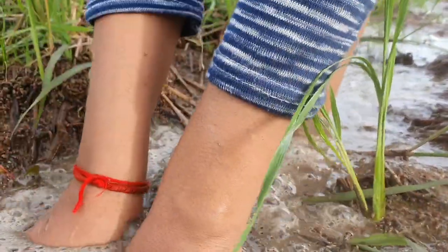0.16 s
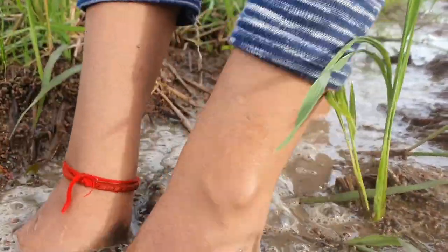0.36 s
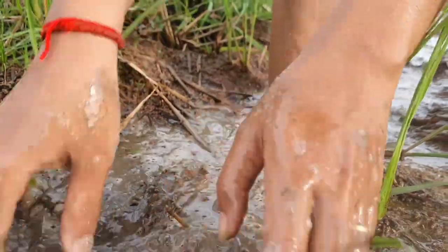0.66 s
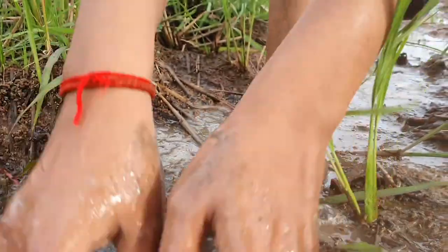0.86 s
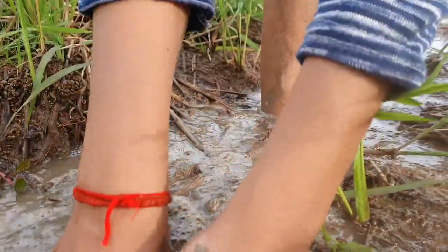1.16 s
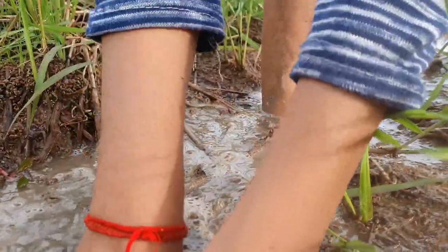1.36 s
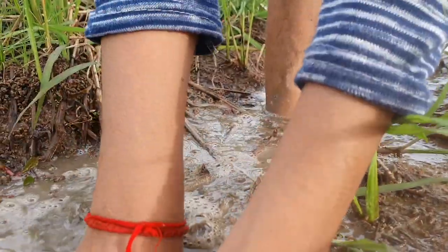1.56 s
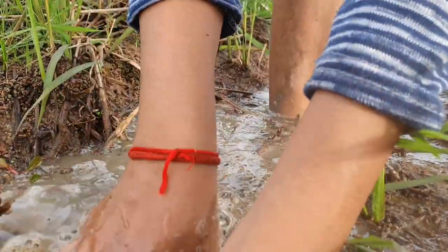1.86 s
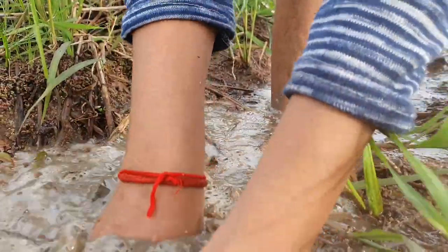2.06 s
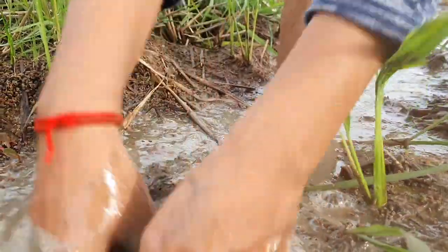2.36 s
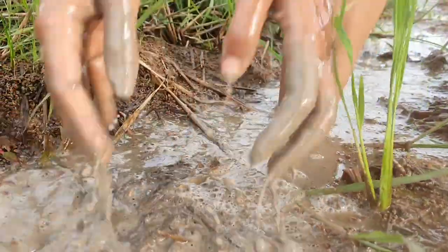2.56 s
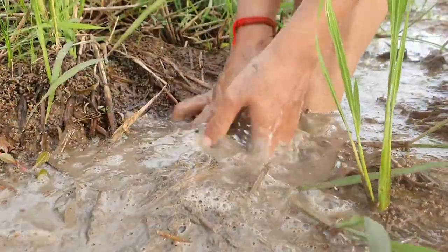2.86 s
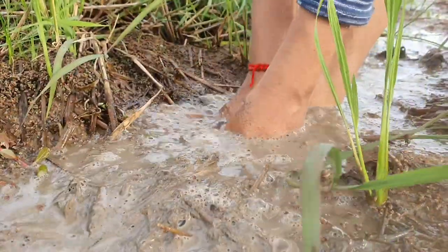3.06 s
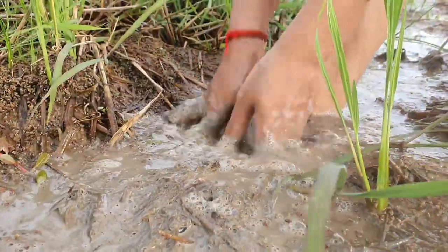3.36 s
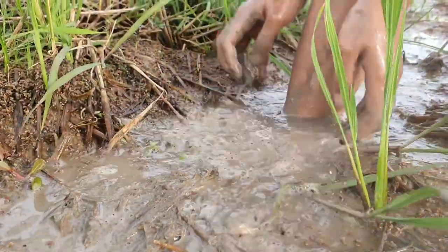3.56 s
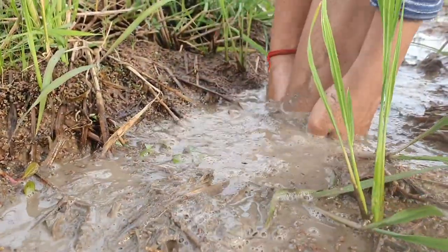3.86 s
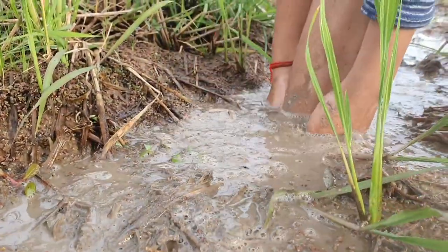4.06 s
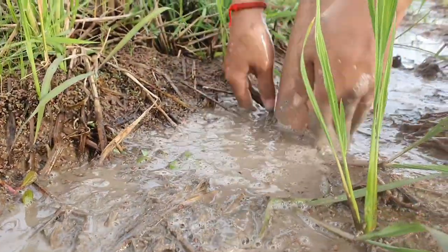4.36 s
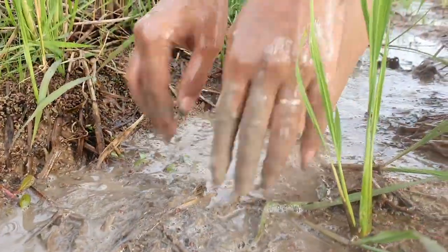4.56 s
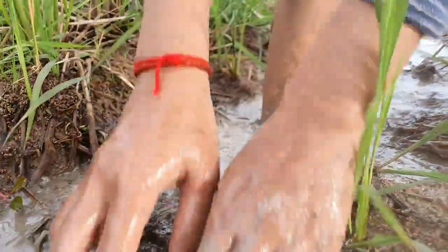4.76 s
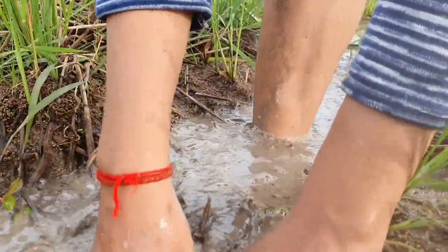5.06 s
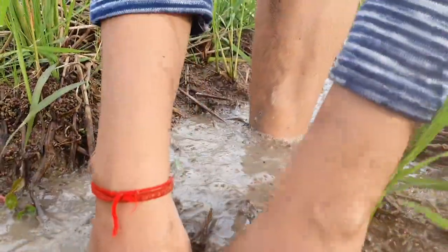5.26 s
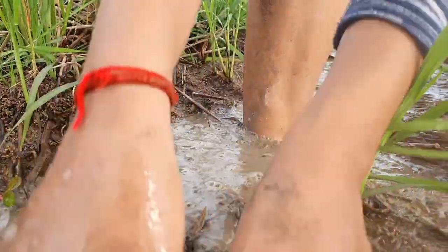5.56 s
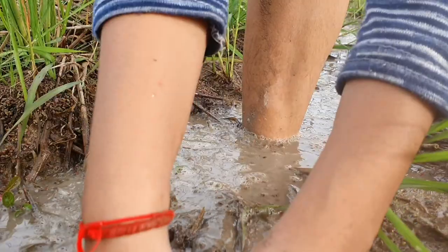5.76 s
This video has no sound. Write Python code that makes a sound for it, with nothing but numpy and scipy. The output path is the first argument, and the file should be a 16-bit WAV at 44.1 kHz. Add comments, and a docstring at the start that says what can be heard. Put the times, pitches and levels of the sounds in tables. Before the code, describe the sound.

Hands slosh and scoop in shallow muddy water, with bubbly plops, wet slaps and fizzing droplets over a low breeze outdoors.

```python
"""A field with shallow muddy water, hands scooping and sloshing close to a phone with two microphone ports.
Trapped air pops as damped sines, most of them rising, over swarms of small random bubbles.
Shaped noise makes the fizzing spray and the slaps on skin and mud; a short noise tail scatters it all.
Low lumpy noise, nearly separate on each port, is the breeze; steady coloured noise is the field's hush."""
import sys
import numpy as np
from scipy import signal
from scipy.fft import rfft, irfft, next_fast_len
from scipy.io import wavfile
from scipy.ndimage import map_coordinates

SR = 44100
rng = np.random.default_rng(int(sys.argv[2]) if len(sys.argv) > 2 else 0)


def wav_record(signal):
    """Record a signal, one row per channel, as 16-bit PCM in the file named by sys.argv[1]."""
    frames = np.transpose(np.atleast_2d(signal))
    bounded = np.clip(frames, -1, 1)
    # unit amplitude maps onto the largest positive 16-bit level
    quanta = np.round(bounded * 32767).astype(np.int16)
    wavfile.write(sys.argv[1], SR, quanta)


N = 261072  # length [samples]

# clear bubbles at the hands, levels before wavering and port balance:
# (time [s], peak level [dB], start pitch [Hz], t60 [ms], pitch rise [1/s])
CLEAR_BUBBLES = [(0.198, -33.5, 2483, 23, 4), (0.2065, -25.5, 590, 3.8, -2), (0.2056, -27.5, 2510, 13, 9),
                 (0.2139, -39, 1600, 50, 28.5), (0.304, -41, 679, 135, 10.5),
                 (0.3408, -29.5, 1010, 8.8, 30), (0.411, -41.5, 3040, 35, -1), (0.415, -42.5, 1080, 35, 24),
                 (0.504, -33, 1540, 23, 23), (0.5246, -33, 1640, 21, 6), (0.753, -38.5, 2040, 56, 0.5),
                 (0.83, -40, 3020, 27, -2), (0.9217, -37.5, 915, 18, -8), (1.084, -36.5, 2270, 22, 31),
                 (1.0968, -33, 1290, 14, -4), (1.1003, -38, 3040, 28, 12), (1.1741, -27, 1130, 11, 25),
                 (1.228, -38.5, 686, 21, 1), (1.246, -41.5, 640, 26, 7), (1.416, -24, 1123, 44, 24),
                 (1.453, -34, 1950, 16, 32), (1.4883, -20.5, 1730, 4.6, 12), (1.488, -32.5, 2654, 23, 6),
                 (1.539, -34.5, 2940, 16, 26), (1.559, -27, 910, 5.5, 55), (1.5907, -32.5, 1620, 12.9, 12),
                 (1.6982, -38.5, 910, 13, 5), (1.7815, -27, 2110, 4.7, 30), (1.915, -35.5, 975, 28, 3),
                 (1.9444, -27.5, 1410, 12, 29), (1.9682, -40, 3180, 14, 4), (2.26, -40, 318, 29, 14),
                 (2.31, -32.5, 790, 31, 11.5), (2.4317, -35, 1266, 22, -2), (2.5405, -34, 1157, 26, 2),
                 (2.5405, -22.5, 2250, 26, 6), (2.6561, -31, 2650, 18, -1), (2.727, -33.5, 1237, 18, -7),
                 (2.728, -43, 675, 40, 10), (2.955, -42.5, 1850, 37, 4), (3.07, -40, 1570, 18, 11),
                 (3.2805, -40.5, 860, 12, 17), (3.47, -41.5, 1000, 11, -3), (3.51, -37.5, 2320, 18, 12),
                 (3.8328, -42, 1216, 30, 1.5), (3.833, -38, 2955, 19, 3.5), (4.042, -46.5, 1470, 21, -6),
                 (4.082, -29.5, 1887, 19.6, 26), (4.9793, -37, 1790, 43, 10), (4.9793, -32, 3520, 16.5, 5),
                 (5.035, -41, 2900, 24, -10), (5.0313, -30.5, 6300, 7.9, 39), (5.0622, -34, 2080, 24, -1),
                 (5.064, -37, 1270, 18, 4), (5.082, -36.5, 2330, 20, -7), (5.24, -38, 1724, 17, 15),
                 (5.346, -28.5, 2180, 12, 31), (5.516, -25.5, 2245, 31, 25), (5.59, -36, 1165, 32, 3.5),
                 (5.67, -40.5, 1560, 17, 7), (5.774, -28, 2520, 16, -1), (5.8073, -33, 2920, 28, -12),
                 (5.8097, -38, 1352, 19, 4), (5.8465, -25.5, 1910, 13, 0), (5.867, -26, 1870, 12, 34)]


def bubbles():
    """Trapped air rings; most pitches climb ever faster, others hold nearly steady."""
    s, db, hz, t60_ms, rise = np.transpose(CLEAR_BUBBLES)
    lag, pan_db = port_gap(s)
    return blips(s, db, hz, t60_ms / 1000, rise, pan_db, lag, attack=1.6, ragged=0.65, size=3500, hold=1.4)


# droplets and small pockets bursting, levels before wavering and port balance:
# (time [s], peak level [dB], pitch [Hz])
BURSTING_DROPLETS = [(0.002, -35.5, 1260), (0.022, -45, 2570), (0.0618, -28.5, 2740), (0.093, -40, 2550),
                     (0.1338, -38.5, 11850), (0.17, -34, 2870), (0.177, -31, 1490), (0.238, -36, 1060),
                     (0.249, -38, 2990), (0.258, -38.5, 1040), (0.2872, -35, 6170), (0.2902, -43, 9800),
                     (0.61, -38.5, 7600), (0.6604, -45, 9650), (0.5805, -39, 1850), (0.807, -41.5, 7260),
                     (0.852, -37, 5730), (0.8898, -42, 6460), (1.035, -39, 10600), (1.0434, -31.5, 2330),
                     (1.0535, -38.5, 4260), (1.134, -31, 1120), (1.2046, -33, 2120), (1.292, -43, 3420),
                     (1.299, -39, 3760), (1.315, -36.5, 2280), (1.4295, -40, 4700), (1.535, -36, 1390),
                     (1.6, -37.5, 13300), (1.6364, -33.5, 2380), (1.6589, -34, 1070), (1.684, -41.5, 11000),
                     (1.7, -47, 12400), (1.838, -28.5, 5500), (1.938, -26, 1390), (1.9725, -29.5, 1504),
                     (2.165, -47, 14400), (2.1823, -44, 13600), (2.4947, -35, 2150), (2.5007, -46, 12800),
                     (2.5342, -37, 4000), (2.5967, -31.5, 3400), (2.611, -23.5, 3280), (2.6175, -32, 3820),
                     (2.648, -31.5, 2670), (2.7518, -40, 9800), (2.8469, -43, 14300), (2.8807, -33.5, 3600),
                     (2.952, -29, 4830), (2.991, -27, 5020), (2.997, -25.5, 4170), (3.019, -40, 2120),
                     (3.0352, -37, 1200), (3.055, -38.5, 1380), (3.093, -39, 1950), (3.121, -42.5, 1260),
                     (3.308, -44.5, 11200), (3.586, -32.5, 1873), (3.6395, -35, 2650), (3.745, -41, 6840),
                     (3.769, -38, 4080), (3.7965, -43.5, 3540), (3.8166, -42, 3430), (4.9653, -25, 3200),
                     (5.098, -32.5, 2200), (5.11, -42, 6750), (5.462, -37, 1790), (5.4783, -47, 4350),
                     (5.5279, -29, 6390), (5.606, -51, 14000), (5.637, -44, 1080), (5.729, -35.5, 695),
                     (5.8883, -33.5, 878)]
# colour of the spit from a bursting droplet: (frequency [Hz], relative density [dB per Hz])
SPIT_COLOUR = [(6000, -20), (11000, -3), (16000, -1)]
DROP_T60_S = 0.012  # at 2000 Hz; shorter above, longer below
DROP_SWELL_S = 0.00033  # main part of the swell's time constant


def droplets():
    """Short pops at a steady pitch; the higher, the shorter, and the more they spit spray."""
    s, db, hz = np.transpose(BURSTING_DROPLETS)
    lag, pan_db = port_gap(s)
    spit_db = db - 3 + 50 * np.log10(hz / 12000)
    spit = bursts(s, spit_db, t60=0.017) * rush(SPIT_COLOUR, [(5000, 0.45)])
    t60 = DROP_T60_S * (2000 / hz) ** 0.5
    attack = DROP_SWELL_S * hz[:, None]  # in cycles
    pops = blips(s, db, hz, t60, 0 * s, pan_db, lag, attack=attack, ragged=0.58, size=800)
    return spit + pops


# colour of the hissing spray: (frequency [Hz], relative density [dB per Hz])
SPRAY_COLOUR = [(2500, -20), (7000, -2.5), (9500, -18.5), (12000, -7), (16000, -9)]


def slosh():
    """Stirred water gurgles, glugs and crackles in clumps; thrown water fizzes, and hisses in its own clumps."""
    stir, bubble_hz, thrown = strokes()
    clumps_db = 1.2 * wobble(16) + 2.2 * wobble(70)
    crowd = stir ** CROWDING
    gurgle = amp(-7.5 + clumps_db) * swarm(count=1700, hz=bubble_hz, crowd=crowd, spread=0.424,
                                           cycles=10, uneven_db=3.5, size=700)
    glug = amp(-7.0 + clumps_db) * swarm(count=1300, hz=0.36 * bubble_hz, crowd=crowd, spread=0.35,
                                         cycles=3.5, uneven_db=3, size=600)
    crackle = amp(-10.5 + clumps_db) * swarm(count=2000, hz=np.full(N, 3100), crowd=crowd, spread=0.3,
                                             cycles=4, uneven_db=4.5, size=250)
    fizz = amp(-5) * swarm(count=3000, hz=np.full(N, 8000), crowd=thrown ** CROWDING, spread=0.61,
                           cycles=3, uneven_db=4.5, size=100)
    spray = amp(-1.5 + 2.4 * wobble(50)) * rush(SPRAY_COLOUR, [(5000, .3)])
    return stir * (gurgle + glug + crackle) + thrown * (fizz + spray)


# sloshes of the hands, gains before each layer's own level:
# (time [s], held [s], stirring gain [dB], typical bubble pitch [Hz], thrown water gain [dB])
HAND_SLOSHES = [(0.0, .17, -44, 1776, -65.5), (0.17, 0.045, -44, 1720, -59), (0.45, 0.23, -56, 1910, -65.5),
                (0.73, 0.14, -54, 1980, -64), (1.075, 0.075, -50, 1870, -60.5),
                (1.219, 0.07, -48.5, 1710, -79), (1.431, 0.24, -48, 1177, -69.5),
                (1.921, 0.052, -48.5, 1030, -63.5), (2.299, 0.095, -53.5, 1610, -71.5),
                (2.5, 0.13, -49, 2860, -62), (3.0, .1, -47.5, 1315, -62.5), (3.18, .16, -55, 1220, -67.5),
                (3.5, 0.079, -51.5, 1840, -61.5), (3.79, 0.013, -52, 1850, -58),
                (4.965, .02, -52, 3060, -66), (5.032, .012, -46, 2400, -53.5), (5.07, .05, -49, 2140, -68),
                (5.499, 0.014, -45.5, 3160, -59.5), (5.56, .11, -58, 1320, -63.5),
                (5.79, 0.09, -51, 1270, -67)]
SWELL_DB_PER_S, SETTLE_DB_PER_S = 260, 250  # how fast the stirring builds and dies away
CALM_DB, TRICKLE_DB, CALM_HZ = -62.5, -63, 2040  # between sloshes: stirring, dripping, bubble pitch
THROWN_SHARPER = 1.8  # thrown water comes and goes this much faster than the stirring
CROWDING = .62  # bubbles a second grow with the gain of the water to this power


def strokes():
    """Each slosh swells, holds and settles: gain of stirring, its bubble pitch, gain of thrown water."""
    s, held, stir_db, hz, thrown_db = np.transpose(HAND_SLOSHES)
    shape = peaked(s, held, SWELL_DB_PER_S, SETTLE_DB_PER_S)
    stir = amp(CALM_DB) + amp(stir_db) @ shape
    pitch = (amp(CALM_DB) * CALM_HZ + (amp(stir_db) * hz) @ shape) / stir  # the stronger water sets the pitch
    trickle = amp(TRICKLE_DB + curves(STILL_SPELLS)[0])
    thrown = trickle + amp(thrown_db) @ shape ** THROWN_SHARPER
    return stir, pitch, thrown


def swarm(count, hz, crowd, spread, cycles, uneven_db, size):
    """Random bubbles of log-normal size round the hands, rms 1; hz and crowd: pitch and density per sample."""
    draw = rng.random(count)
    odd = np.clip(rng.standard_normal((count, 5)), -2, 2)
    at = np.minimum(np.searchsorted(np.cumsum(crowd), draw * crowd.sum()), N - 1)
    s = at / SR
    pitch = np.clip(hz[at] * np.exp(spread * odd[:, 0]), 250, 15000)
    t60 = cycles * np.exp(0.62 * odd[:, 1]) / pitch
    lag, pan_db = port_gap(s)
    lag, pan_db = lag + 1.5e-4 * odd[:, 2], pan_db + 4 * odd[:, 3]  # scattered round the hands
    db = uneven_db * odd[:, 4] - 10 * np.log10(crowd[at])  # denser but softer, so the swarm stays even
    return unit(blips(s, db, pitch, t60, 0.2 / t60, pan_db, lag, attack=8, ragged=0.4, size=size))


# slaps of water on skin and mud, gains on noise of rms 1:
# (time [s], splash gain [dB], low squelch gain [dB])
WATER_SLAPS = [(0.207, -61, -32), (1.1326, -44, -49), (1.214, -62, -48), (1.241, -62, -54),
               (1.2982, -44.5, -42.5), (2.4177, -48, -42), (2.5391, -36.5, -59), (2.8807, -45, -41),
               (2.992, -39, -43), (3.014, -62, -42), (3.832, -42.5, -64), (4.037, -45, -64),
               (5.0312, -29.5, -55), (5.1273, -61, -43.5), (5.3434, -55, -40.5), (5.516, -34, -43),
               (5.728, -65, -46), (5.806, -40.5, -68)]
# colour of a breaking water film: (frequency [Hz], relative density [dB per Hz])
FILM_COLOUR = [(300, -11), (4000, 10), (16000, -15)]
# colour of a squelch of mud: (frequency [Hz], relative density [dB per Hz])
MUD_COLOUR = [(120, 5), (300, 3), (900, -8.5), (2500, -6), (6000, -62)]
SLAP_T60_S, SQUELCH_T60_S = 0.031, 0.05


def smacks():
    """Slaps break the water film and squelch the mud: quick bursts of bright and low noise."""
    slap_s, splash_db, squelch_db = np.transpose(WATER_SLAPS)
    film = bursts(slap_s, splash_db, SLAP_T60_S) * rush(FILM_COLOUR, [(1000, 0.17)])
    squelch = bursts(slap_s, squelch_db, SQUELCH_T60_S) * rush(MUD_COLOUR, [(500, 1.0)])
    return film + squelch


# where the hands are, as heard at the ports: (time [s], right port later by [ms])
HAND_PLACE = [(0, 0.25), (1.7, 0.29), (2.55, 0.19), (3, 0.086), (4.5, 0.03), (5, 0.19), (5.92, 0.2)]


def port_gap(s):
    """A sound at the hands: delay of the right port in seconds, and the left-right dB that goes with it."""
    later_ms = np.interp(s, *np.transpose(HAND_PLACE))
    return later_ms / 1000, -1.5 + 16 * later_ms


def surroundings(x):
    """Arms, bank and stems scatter a short diffuse answer."""
    t = np.arange(3000) / SR
    tail = rng.standard_normal((2, len(t))) * amp(-60 * t / 0.06) * (t > .002)
    return signal.fftconvolve(x, tail / np.linalg.norm(tail[0]), axes=1)[:, :N]


# breeze on the ports: (time [s], level [dB], left minus right [dB])
BREEZE_ON_PORTS = [(0, -46.5, -7), (.45, -41.5, -9), (1.0, -39.5, -8), (1.7, -43, -1), (2.2, -48.5, -3),
                   (2.95, -47, -3.5), (3.3, -45, -12.5), (3.85, -50.5, 0), (4.6, -45, -12.5),
                   (5.15, -50, -3.5), (5.92, -46.5, -9.5)]
# sudden gusts, gains added to the breeze: (time [s], left gain [dB], right gain [dB])
SUDDEN_GUSTS = [(0.0, -32, -41), (0.243, -38, -36), (.385, -24, -25), (.44, -50, -41), (0.633, -41, -20.5),
                (.97, -37, -32), (1.322, -47, -31), (3.24, -49, -39), (4.82, -61, -33)]
# colour of the buffeting: (frequency [Hz], relative density [dB per Hz])
BUFFET_COLOUR = [(12, -48), (20, -8.5), (82, -2), (125, -17.5), (161, -23), (500, -50.5), (650, -95),
                 (1100, -120)]
GUST_RISE_DB_PER_S, GUST_FALL_DB_PER_S = 249, 176


def breeze():
    """Eddies thump each port almost separately, in lumps; gusts come on top."""
    level_db, pan_db = curves(BREEZE_ON_PORTS)
    s, *ports_db = np.transpose(SUDDEN_GUSTS)
    gusts = amp(ports_db) @ peaked(s, 0 * s, GUST_RISE_DB_PER_S, GUST_FALL_DB_PER_S)
    steady = amp([level_db + pan_db / 2, level_db - pan_db / 2])
    lumps = amp(2.5 * np.array([wobble(18), wobble(18)]))
    buffet = unit(lumps * rush(BUFFET_COLOUR, [(60, 0.17)]))
    return (steady + gusts) * buffet


# colour of the field's hush: (frequency [Hz], relative density [dB per Hz])
HUSH_COLOUR = [(70, -3.5), (120, -4.5), (200, -8), (350, -8.5), (670, -13), (1050, -23.5), (2300, -25),
               (3400, -20), (4400, -26.5), (9400, -38), (16000, -38)]
# how alike the hush is at both ports: (frequency [Hz], likeness [-1 to 1])
HUSH_LIKENESS = [(130, 1), (300, 0.46), (650, 0.0086)]
# change in level of the hush, and of the dripping in strokes(): (time [s], level [dB])
STILL_SPELLS = [(0, 0), (3.6, 0), (4.5, -3.5), (5.1, -2)]


def field():
    """The hush of grass and distance: coloured noise, slightly unsteady."""
    drift_db = .7 * wobble(3)
    return amp(-51.5 + drift_db + curves(STILL_SPELLS)[0]) * rush(HUSH_COLOUR, HUSH_LIKENESS)


def blips(s, db, hz, t60, rise, pan_db, lag, attack, ragged, size, hold=1):
    """Damped sines, gliding by rise; a positive lag reaches the left port first, the right port later."""
    s, db, hz, t60, rise, pan_db, lag = (np.asarray(v)[:, None] for v in (s, db, hz, t60, rise, pan_db, lag))
    out = np.zeros((2, N))
    for port, side in enumerate((1, -1)):
        start = (s - side * lag / 2) * SR
        index = np.clip(np.floor(start).astype(int) + np.arange(size), 0, N - 1)
        t = np.maximum(index - start, 0) / SR
        # the neck pinches off over a few cycles, set by attack; long gulps swell slower
        swell = 1 - np.exp(-t / (attack / hz + 0.01 * t60))
        # small bubbles are torn by the splash, all waver
        tearing = ragged * np.minimum(hz / 3000, 1) ** 2 * wobble(1200)[index]
        torn = 1 + tearing + .25 * wobble(220)[index]
        shape = swell * amp(-60 * (t / t60) ** hold)
        shape /= shape.max(axis=1, keepdims=True) + 1e-9
        glide = rise * t ** 2 / 2 + np.minimum(rise * t, 1.5) ** 2 * t / 3
        ring = amp(db + side * pan_db / 2) * shape * torn * np.sin(2 * np.pi * hz * (t + glide))
        out[port] = np.bincount(index.ravel(), ring.ravel(), N)
    out[:, -1] = 0  # drops what was clipped onto the last sample
    return out


def rush(spectrum, alike):
    """Stereo noise of rms 1 with a colour and a left-right likeness, mixed from mid and side."""
    def colour(hz):
        turn = np.arccos(np.clip(along(alike, hz), -1, 1)) / 2
        return amp(along(spectrum, hz)) * [np.cos(turn), np.sin(turn)]
    mid, side = filtered(rng.standard_normal((2, N)), colour)
    return unit(np.array([mid + side, mid - side]))


def peaked(s, held, rise_db_per_s, fall_db_per_s):
    """One row of gain per event: rise, hold, fall, straight in dB."""
    t = np.arange(N) / SR
    s, held = s[:, None], held[:, None]
    return amp(-rise_db_per_s * np.maximum(s - t, 0) - fall_db_per_s * np.maximum(t - s - held, 0))


def bursts(s, db, t60):
    """Gain that jumps at each time and dies away."""
    t = np.arange(900) / SR
    hits = np.bincount((s * SR).astype(int), amp(db), N)
    decay = amp(-60 * t / t60) * (1 - np.exp(-t / 0.00023))
    return np.convolve(hits, decay)[:N]


def filtered(x, response):
    """x times a response of frequency."""
    m = next_fast_len(N + 8192)
    return irfft(rfft(x, m) * response(np.fft.rfftfreq(m, 1 / SR)), m)[..., :N]


def wobble(rate):
    """A smooth random curve, rate knots a second."""
    knots = rng.standard_normal(int(N * rate / SR) + 4)
    return map_coordinates(knots, [np.arange(N) * rate / SR])


def curves(rows):
    """One value per sample for each column after the time."""
    s, *cols = np.transpose(rows)
    return [np.interp(np.arange(N) / SR, s, c) for c in cols]


def along(points, hz):
    """(Hz, value) points on a log axis."""
    f, v = np.transpose(points)
    return np.interp(np.log(hz + 1), np.log(f + 1), v)


def amp(db):
    """Decibels to gain."""
    return 10 ** (np.asarray(db) / 20)


def unit(x):
    """Scaled to rms 1."""
    return x / np.sqrt(np.mean(x ** 2) + 1e-20)


def scene():
    """Water close by, its scatter, the breeze and the field."""
    water = bubbles() + smacks() + droplets() + slosh()
    scatter = amp(-18) * surroundings(water)
    return water + scatter + breeze() + field()


TOP_HZ = 15900  # band limit of the phone


def record(dry):
    """The phone keeps nothing above its band limit."""
    return filtered(dry, lambda hz: hz < TOP_HZ)


dry = scene()
out = record(dry)
wav_record(out)
```